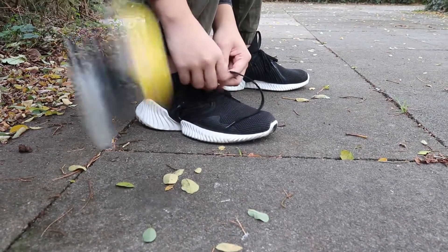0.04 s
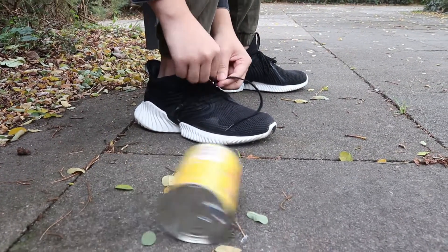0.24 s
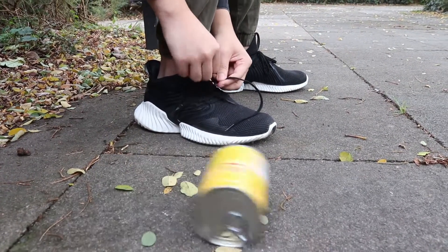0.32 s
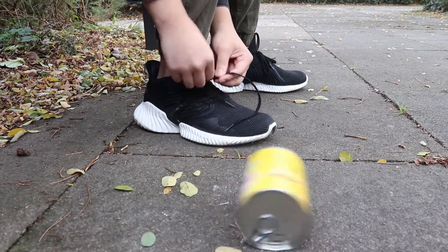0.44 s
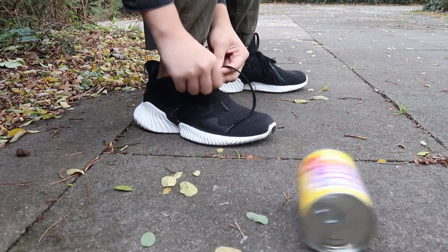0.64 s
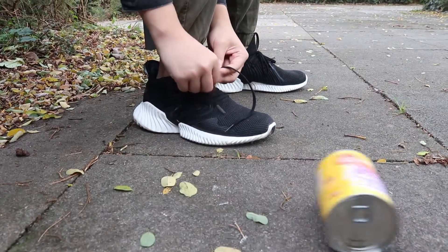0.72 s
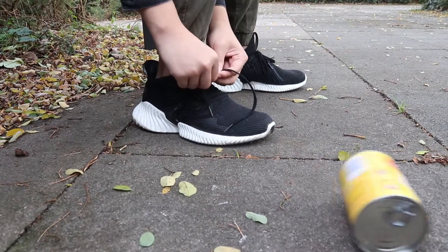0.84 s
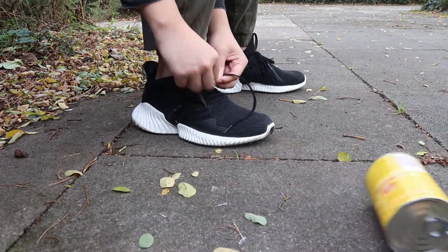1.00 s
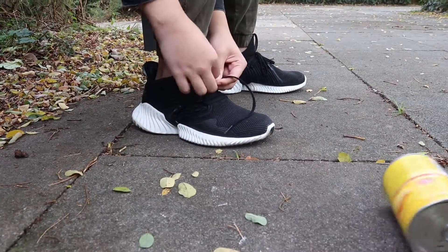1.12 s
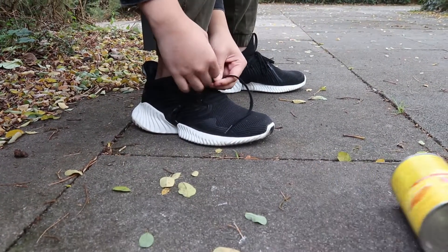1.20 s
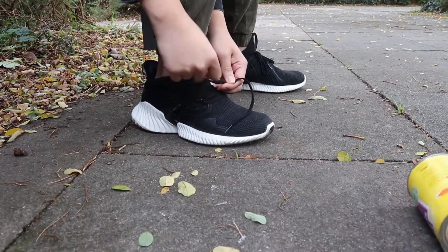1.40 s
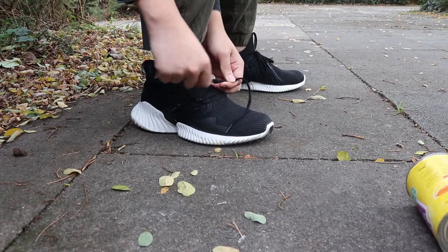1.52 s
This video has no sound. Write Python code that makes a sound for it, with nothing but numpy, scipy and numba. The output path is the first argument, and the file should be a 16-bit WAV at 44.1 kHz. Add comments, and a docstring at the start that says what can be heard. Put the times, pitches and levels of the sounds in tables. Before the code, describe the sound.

After a brief outdoor hush, a heavy metal tin smacks the pavement close to the microphone, overloading it, then knocks and rumbles along the gritty ground, fading into a faint low hum.

```python
"""Outdoor concrete paving: a full food tin drops close to a stereo microphone, clanks into overload, hops,
and rolls off to the right. Impacts excite the tin's damped modes, with noise bursts for crack and ticks;
grit under the rims drives a low contact resonance that wanders. Filtered noise makes the soft outdoor air;
sine oscillators make a low wavering hum and a thin steady tone near the end."""
import sys
import numpy as np
from scipy import signal
from scipy.fft import rfft, irfft
from scipy.io import wavfile
from scipy.ndimage import uniform_filter1d, map_coordinates
from numba import njit

SR = 44100
rng = np.random.default_rng(int(sys.argv[2]) if len(sys.argv) > 2 else 0)


def decibels_to_gain(level_db):
    """Convert a level in decibels to a linear amplitude gain (20 dB per decade)."""
    exponent = np.asarray(level_db, float) / 20
    return 10 ** exponent


def generate_wav(signal):
    """Clip the signal to [-1, 1] and save it as 16-bit WAV at the path in sys.argv[1]."""
    frames = np.transpose(np.atleast_2d(signal))
    scaled = np.clip(frames, -1, 1) * 32767
    pcm = np.round(scaled).astype(np.int16)
    wavfile.write(sys.argv[1], SR, pcm)


N = 68355  # samples


@njit
def svf(x, hz, width):
    """State-variable resonance: a band-pass with a moving centre, gain 1 at the centre."""
    y, band_state, low_state = np.empty(len(x)), 0., 0.
    for i in range(len(x)):
        g, k = np.tan(np.pi * hz[i] / SR), width / hz[i]
        v = (band_state + g * (x[i] - low_state)) / (1 + g * (g + k))
        band_state = 2 * v - band_state
        low_state = low_state + 2 * g * v
        y[i] = k * v
    return y


def band(x, hz, width):
    """Simple resonance: a band-pass of the given width (Hz) at a fixed or moving centre."""
    return svf(x, hz + np.zeros(len(x)), 1. * width)


def unit(x):
    """Power normalisation: scale to rms 1."""
    return x / np.sqrt(np.mean(x ** 2))


def colour(x, points):
    """Spectral weighting: filter by (Hz, dB) points joined on a log-frequency axis."""
    p = np.array(points)
    f = np.arange(len(x) // 2 + 1) * SR / len(x) + 1  # the added 1 Hz keeps the log finite
    gain_db = np.interp(np.log(f), np.log(p[:, 0]), p[:, 1])
    return irfft(rfft(x) * decibels_to_gain(gain_db), len(x))


def walk(rate):
    """Slow random modulation: levels held 1 / rate s and slewed twice, spread 1."""
    k = int(SR / rate)
    steps = np.repeat(rng.standard_normal(N // k + 2), k)
    return unit(uniform_filter1d(uniform_filter1d(steps, k), k)[:N])


# spectral density of the outdoor air: pitch_hz [Hz], density_db [dB per Hz, relative]
AIR_SPECTRUM = [(20, 0.5), (40, -14), (70, -2.5), (130, -5.5), (250, -4), (500, -14.5), (1000, -16.5),
                (2000, -25.5), (4500, -30), (9000, -33), (15500, -44.5)]
AIR_DB, AIR_SWELL_DB, AIR_FLICKER_DB = -46.5, .4, .6
AIR_ALIKE_HZ = 1390


def air():
    """Diffuse-field coherence: outdoor hush alike in the bass, unrelated in the treble, swelling gently."""
    mid, side = (colour(rng.standard_normal(N), AIR_SPECTRUM) * decibels_to_gain(AIR_FLICKER_DB * walk(9))
                 for _ in range(2))
    side = colour(side, [(60, -22), (AIR_ALIKE_HZ, -5), (3500, 0), (16000, 0)])
    swell = decibels_to_gain(AIR_DB + AIR_SWELL_DB * walk(2.56))
    return swell * np.array([mid + side, mid - side]) / np.sqrt(np.mean(mid ** 2))


# modes of the tin: pitch_hz [Hz], level_db [dB], t60_s [s]
TIN_MODES = [(148.5, -16, 0.074), (317.3, -2, 0.071), (528.5, -4.5, 0.043), (674, -4, 0.021),
             (929, 0, 0.017), (992, -12.5, 0.018), (1149, -10, 0.027), (1460, -12.5, 0.038),
             (1947, 1, 0.0097), (2500, -0.5, 0.0079), (3113, -3, 0.0099), (3600, -8.5, 0.014),
             (4136, -13, .02), (5150, -13, .018)]
LOW_TOP_HZ, MID_TOP_HZ = 400, 1400  # bounds between the low, middle and bright groups


def ring(low, mid, bright):
    """Modal superposition: damped sine modes in three groups, each driven by its own force."""
    out = 0
    for k, (hz, db, t60) in enumerate(TIN_MODES):
        pole = np.exp(2j * np.pi * hz / SR - np.log(1000) / (t60 * SR))
        force = low if hz < LOW_TOP_HZ else mid if hz < MID_TOP_HZ else bright
        mode = signal.lfilter([1], [1, -pole], force).imag
        out = out + (-1) ** k * decibels_to_gain(db) * mode  # neighbours in opposite polarity
    return out


# spectral density of the landing crack: pitch_hz [Hz], density_db [dB per Hz, relative]
CRACK_SPECTRUM = [(120, -57), (200, -0.5), (678, -4.5), (925, 2), (1410, -5.5), (2570, -0.5), (4770, -4.5),
                  (7810, -6.5), (15600, -17)]
LAND_S, CLATTER_S, CLATTER_RELEASE_S = .2345, .0085, .002
LAND_LOW_DB, LAND_MID_DB, LAND_BRIGHT_DB = -0.5, -5, 5.5  # force on each group of modes
CRACK_DB, CRACK_TAIL_DB, CRACK_TAIL_T60_S = 1, -27, .1  # the tail is relative to the crack
CRACK_ALIKE = 0.67  # share of the crack's power common to both channels
THUD_DB, THUD_S = -12.5, 0.0046


def landing(t):
    """Forced vibration: rim, wall and contents meet the ground in a burst of clatter that rings every mode.
    A thud pulse and a broad noise crack with a faint tail ride on it."""
    u = t - LAND_S
    hold = (u > 0) * np.exp(-np.maximum(u - CLATTER_S, 0) / CLATTER_RELEASE_S)
    force = hold * rng.standard_normal(N) / np.sqrt(CLATTER_S * SR)
    # the push on the low modes grows with a 0.5 ms time constant, then stops
    push = (u > 0) * (u < CLATTER_S + CLATTER_RELEASE_S) * np.exp(u.clip(-1, .02) / 0.0005)
    push = push / push.sum()
    rings = ring(decibels_to_gain(LAND_LOW_DB) * push, decibels_to_gain(LAND_MID_DB) * force, decibels_to_gain(LAND_BRIGHT_DB) * force)
    thud = decibels_to_gain(THUD_DB) * np.sin(np.pi * np.clip((u - CLATTER_S) / THUD_S, 0, 1)) ** 2
    tail = (u > 0) * decibels_to_gain(CRACK_TAIL_DB - 60 * np.maximum(u, 0) / CRACK_TAIL_T60_S)
    crack = [decibels_to_gain(CRACK_DB) * (hold + tail) * unit(colour(rng.standard_normal(N), CRACK_SPECTRUM))
             for _ in range(3)]
    clank = rings + thud + np.sqrt(CRACK_ALIKE) * crack[0]
    scattered = np.sqrt(1 - CRACK_ALIKE) * np.array(crack[1:])
    return clank, scattered


def echo(x, db, t60):
    """Diffuse reverberation: exponentially decaying scattered returns, different in each channel."""
    k = np.arange(SR // 3)
    tail = rng.standard_normal((2, len(k))) * decibels_to_gain(-60 * k / SR / t60)
    tail = tail / np.sqrt(np.sum(tail ** 2, axis=1, keepdims=True))
    return decibels_to_gain(db) * signal.fftconvolve(x[None], tail)[:, :N]


# course of the roll: start_s [s], rumble_db [dB], contact_hz [Hz],
# rattle_db [dB against the rumble], scrape_db [dB against the rumble]
ROLL_COURSE = [(0.312, -26, 295, -27, -29), (0.334, -20, 276, -2.5, -23), (0.378, -28.5, 265, -18.5, -12.5),
               (0.41, -23.5, 266.5, -15, -23), (0.47, -25, 226.6, -11.5, -15), (0.492, -30.5, 229, -7, -15),
               (0.524, -18.5, 251, -8.5, -22.5), (0.566, -25, 199, -16.5, -22),
               (0.644, -31.5, 265, -12.5, -24.5), (0.686, -21, 202, -18.5, -39),
               (0.714, -38.5, 198, -18, -25), (0.734, -20, 215.4, -11.5, -29),
               (0.802, -28.5, 219, -28.5, -40), (0.83, -16.5, 206, -20, -32),
               (0.878, -27.5, 233, -27.5, -36.5), (0.91, -26, 199, -27, -39), (0.97, -31.5, 218, -33, -46),
               (1.018, -24.5, 199.6, -32.5, -44.5), (1.11, -35.5, 227, -32, -45),
               (1.172, -30.5, 214, -33, -40), (1.202, -44, 216, -26.5, -30),
               (1.336, -33.5, 213, -27, -38.5), (1.398, -53, 163, -26, -24), (1.428, -39.5, 163, -15, -39),
               (1.47, -69.5, 165, -9.5, -31)]
# what the contact passes: pitch_hz [Hz], gain_db [dB]
CONTACT_GAIN = [(60, -20), (130, 3.5), (320, 0.5), (420, -13.5), (2000, -39)]
# what is heard of the scrape: pitch_hz [Hz], gain_db [dB]
SCRAPE_GAIN = [(800, -26), (1500, 0), (3500, 1), (5000, -4), (7000, -29), (16000, -40)]
GRIT_PER_S, GRIT_SPREAD_DB = 1500, 2.5
CONTACT_WIDTH_HZ = 42
ROLL_RING_DB = -2.5  # low modes against the contact resonance at 250.5 Hz, before CONTACT_GAIN
RING_DB_PER_HZ = 0.59  # the tin's own low modes sound more on a stiffer, higher contact


def rolling(t):
    """Mass-spring resonance: grit jolts the tin on its springy contact.
    More faintly, the same grit rattles the middle modes and scrapes the bright ones."""
    r = np.array(ROLL_COURSE)
    rumble_db, hz, rattle_db, scrape_db = (np.interp(t, r[:, 0], r[:, k]) for k in (1, 2, 3, 4))
    on = np.clip(np.minimum(t - r[0, 0], r[-1, 0] - t) / .004, 0, 1)

    # sparse jolts of random sign and size
    chance, sign, size = rng.random((3, N))
    jolt_size = decibels_to_gain(-GRIT_SPREAD_DB * np.log(size + 1e-9))
    grit = (chance < GRIT_PER_S / SR) * np.sign(sign - .5) * jolt_size
    still = 0 * grit

    contact = band(band(grit, hz, CONTACT_WIDTH_HZ), hz, 2.1 * CONTACT_WIDTH_HZ)
    ring_gain = decibels_to_gain(ROLL_RING_DB + RING_DB_PER_HZ * (hz - 250.5))
    rumble = unit(contact) + ring_gain * unit(ring(grit, still, still))
    rumble = colour(rumble, CONTACT_GAIN)
    # level the rumble over about 20 ms, so that rumble_db sets it
    rumble = rumble / np.sqrt(uniform_filter1d(rumble ** 2, size=900) + 1e-12)

    rattle = unit(band(ring(still, grit, still), 820, 1000))
    scrape = unit(colour(unit(ring(still, still, grit)) + 3.0 * unit(grit), SCRAPE_GAIN))
    return on * decibels_to_gain(rumble_db) * (rumble + decibels_to_gain(rattle_db) * rattle + decibels_to_gain(scrape_db) * scrape)


# knocks of a rim on the paving: start_s [s], sharp_db [dB, sharp force], tick_hz [Hz],
# soft_db [dB, push on the middle modes], pitch_hz [Hz, pitch of that push]
RIM_KNOCKS = [(0.3164, -27.5, 3600, -4, 520), (.33, -10, 3400, -3.5, 850), (0.3531, -19, 3600, -6, 950),
              (.398, -27.5, 3300, -8.5, 590), (.4035, -29, 3500, -19, 520), (0.4211, -32, 3000, -13, 530),
              (.463, -24.5, 3400, -4, 700), (.506, -29.5, 2900, -20, 680),
              (0.5153, -27.5, 2800, -11.5, 850), (0.5226, -23.5, 2900, -15.5, 850),
              (.532, -35, 4200, -8, 520), (0.538, -30, 2600, -15, 1100), (.5745, -34.5, 2500, -13, 850),
              (0.589, -32, 2800, -24, 520), (0.6241, -34, 2600, -5, 550), (0.6536, -37, 3200, -12.5, 540),
              (0.67, -41, 2600, -30, 540), (.677, -34.5, 3800, -17.5, 580), (0.7234, -31, 3300, -9, 530),
              (0.7491, -36, 3500, -17, 940), (.773, -44.5, 3000, -21.5, 930),
              (.8235, -34, 4000, -12.5, 570), (.836, -34, 4200, -13, 550),
              (1.0215, -39.5, 4700, -32.5, 500), (1.4569, -41, 4730, -50, 1200)]
SHARP_S, SOFT_S = 0.00078, .006
TICK_DB, TICK_T60_S, TICK_WIDTH_HZ = -6, 0.013, 2200  # tick level relative to sharp_db; width of the force


def knocks():
    """Impact excitation: a soft push rings the middle modes near its pitch.
    A sharp, brief one rings the bright modes, with a tick of decaying band noise."""
    soft_force, sharp_force, tick_env = np.zeros((3, N))
    centre = np.full(N, 3000.)
    n, m = int(SHARP_S * SR), int(SOFT_S * SR)
    rough = rng.standard_normal((len(RIM_KNOCKS), 256))
    fade = decibels_to_gain(-60 * np.arange(2000) / SR / TICK_T60_S)
    soft = np.exp(-3 * np.arange(m) / m) * 3 / m
    for (s, sharp_db, tick_hz, soft_db, hz), r in zip(RIM_KNOCKS, rough):
        i = int(s * SR)
        soft_force[i:i + m] += decibels_to_gain(soft_db) * soft * np.sin(2 * np.pi * hz * np.arange(m) / SR)
        sharp_force[i:i + n] += decibels_to_gain(sharp_db) * r[:n] * np.hanning(n) / np.sqrt(n / 2)
        tick_env[i:i + len(fade)] += decibels_to_gain(sharp_db + TICK_DB) * fade
        centre[i:] = tick_hz
    sharp = band(sharp_force, centre, TICK_WIDTH_HZ)
    rings = ring(np.zeros(N), soft_force, sharp)
    rings = colour(rings, [(100, -23.5), (300, -1), (16000, 0.5)])
    hiss = band(band(rng.standard_normal(N), centre, 3000), centre, 3000)
    return rings + tick_env * unit(hiss)


# course of the hum: start_s [s], pitch_hz [Hz], level_db [dB rms of the fundamental]
HUM_COURSE = [(1.32, 80.7, -59.5), (1.402, 77.9, -29), (1.462, 79.7, -33.5), (1.55, 75.5, -28.5)]
HUM_OCTAVE_DB = -20.5  # relative to the fundamental
TONE_HZ, TONE_DB, TONE_S, TONE_RISE_S = 1331, -59.5, 1.235, .03  # level in dB rms


def tones(t):
    """Harmonic oscillation: a low hum with its octave swells and wavers beside a thin steady tone."""
    h = np.array(HUM_COURSE)
    phase = 2 * np.pi * np.cumsum(np.interp(t, h[:, 0], h[:, 1])) / SR
    hum_level = decibels_to_gain(np.interp(t, h[:, 0], h[:, 2], left=-90))
    hum = hum_level * (np.sin(phase) + decibels_to_gain(HUM_OCTAVE_DB) * np.sin(2 * phase))
    rise = np.clip((t - TONE_S) / TONE_RISE_S, 0, 1)
    thin = decibels_to_gain(TONE_DB) * rise * np.sin(2 * np.pi * TONE_HZ * t)
    return np.sqrt(2) * (hum + thin)  # peak to rms


LAG_MS = (-0.066, 0.015)  # delay of left behind right, at the landing and at the end
GROUND_DB, GROUND_T60_S = -18.5, 0.06
YARD_DB, YARD_T60_S = -28, .2


def scene():
    """Interaural-style delay: a drifting lag between channels carries the tin rightwards.
    The ground scatters it and the yard returns a short faint echo."""
    t = np.arange(N) / SR
    clank, scattered = landing(t)
    tin = clank + rolling(t) + knocks()
    half_lag = np.interp(t, [LAND_S, t[-1]], LAG_MS) * SR / 2000  # samples
    near = np.array([map_coordinates(tin, [t * SR - side * half_lag], mode="mirror") for side in (1, -1)])
    space = echo(tin, GROUND_DB, GROUND_T60_S) + echo(tin, YARD_DB, YARD_T60_S)
    return near + scattered + space + air() + tones(t)


def band_limit(x):
    """A steep low-pass at the top of the band."""
    return signal.sosfilt(signal.butter(12, 15760, fs=SR, output="sos"), x)


def record(dry):
    """Amplitude limiting: the recorder overloads and cuts the peaks flat."""
    clip_level = 0.95  # of full scale
    mix = np.clip(dry, -clip_level, clip_level)
    return band_limit(mix)


dry = scene()
out = record(dry)
generate_wav(out)
```